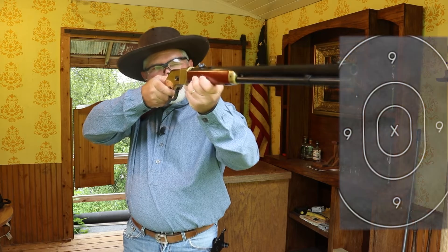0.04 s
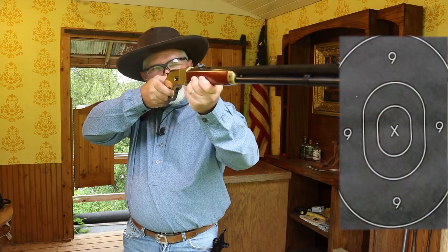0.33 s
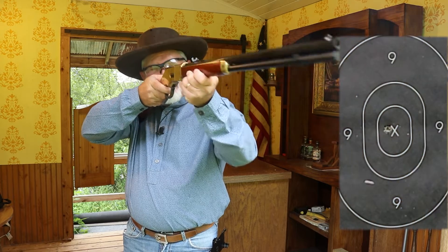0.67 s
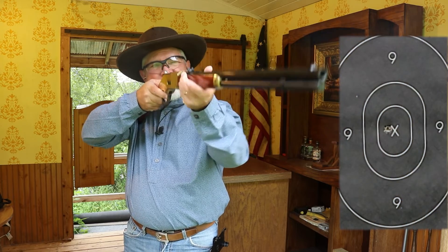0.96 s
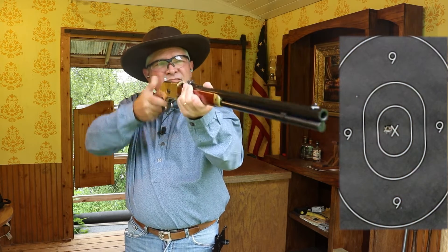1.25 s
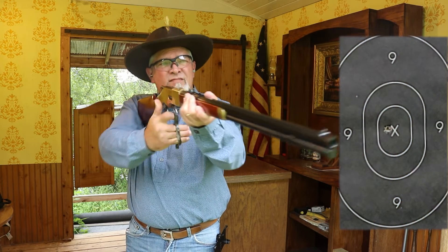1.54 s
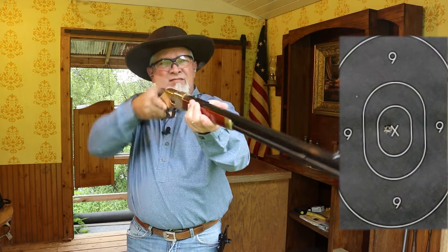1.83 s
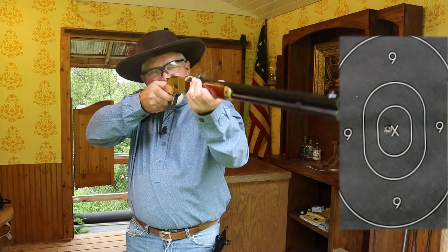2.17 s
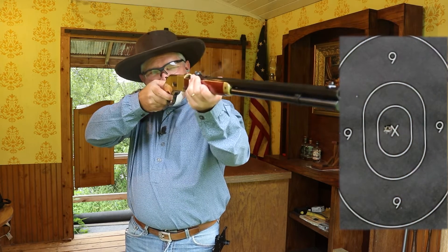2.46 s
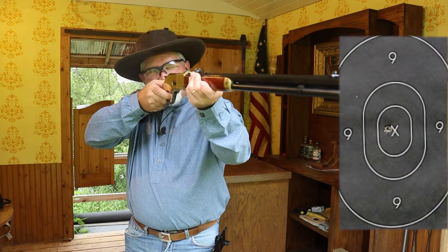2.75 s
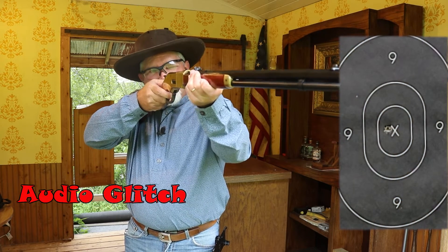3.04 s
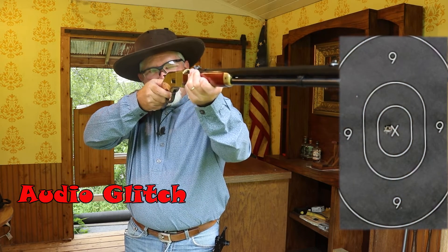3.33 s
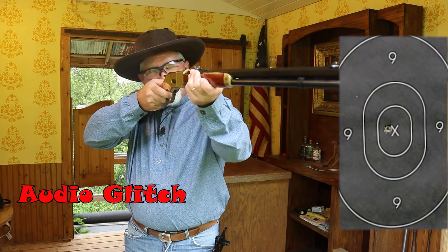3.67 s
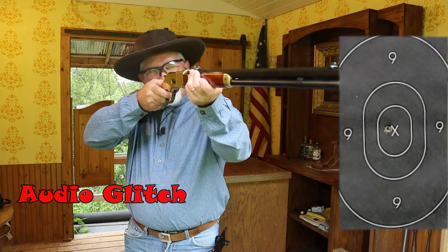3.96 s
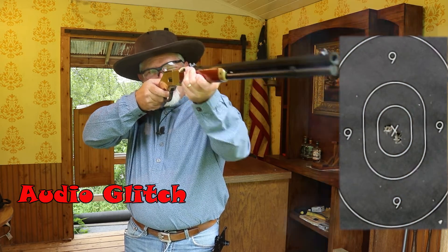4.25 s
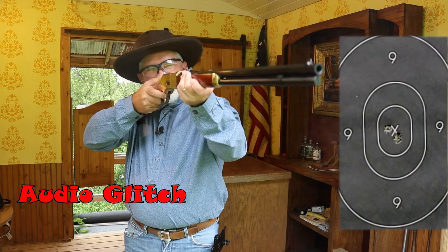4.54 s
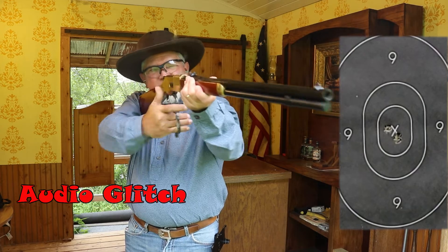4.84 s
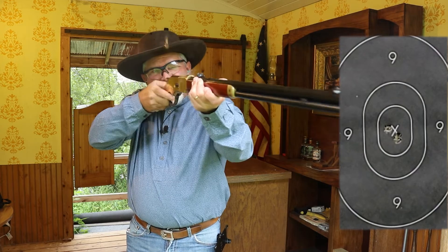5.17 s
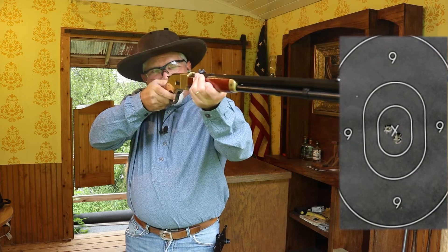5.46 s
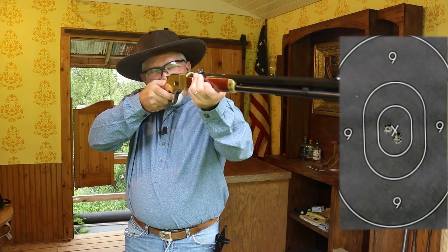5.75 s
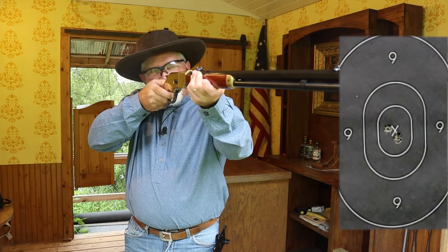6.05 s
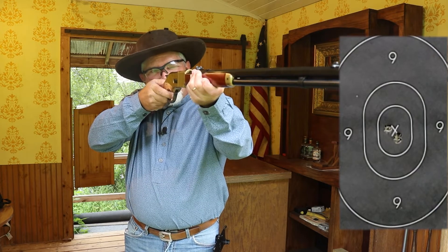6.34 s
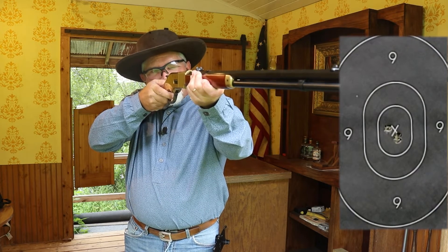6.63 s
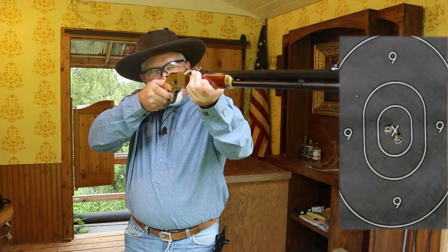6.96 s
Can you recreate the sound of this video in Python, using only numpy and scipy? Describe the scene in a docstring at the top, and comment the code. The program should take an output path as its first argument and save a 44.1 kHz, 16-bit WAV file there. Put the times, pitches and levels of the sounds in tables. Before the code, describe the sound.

A lever-action rifle fires and cycles; the sound cuts to hiss, returning with a steel clack and stuttering outdoor air.

```python
"""Lever-action rifle by woodland.

A shot from a wooden room overloads a close microphone and rolls back from the trees. The steel lever
clacks open and shut. Outside, a breeze rumbles, insects buzz and something hoots far off.
The signal drops out briefly, then chops up a metallic ring and sinks to over two seconds of almost
bare hiss. It returns on another lever clack and a second shot's echo, stuttering with dull thuds."""
import sys
import numpy as np
from scipy import signal
from scipy.fft import rfft, irfft
from scipy.io import wavfile
from scipy.ndimage import uniform_filter1d

SR = 44100
rng = np.random.default_rng(int(sys.argv[2]) if len(sys.argv) > 2 else 0)


def transcribe(signal):
    """Save signal, clipped to [-1, 1], as a 16-bit WAV file at the path in sys.argv[1]."""
    frames = np.atleast_2d(signal).T
    limited = np.clip(frames, -1, 1)
    pcm = np.round(limited * 32767).astype(np.int16)
    wavfile.write(sys.argv[1], SR, pcm)


N = 317520
TIME = np.arange(N) / SR


def from_db(db):
    return 10 ** (np.asarray(db) / 20)


def unit_rms(x):
    return x / np.sqrt(np.mean(x ** 2) + 1e-20)


def curves(rows):
    """Each column after the first, interpolated over time."""
    times_s, *columns = np.transpose(rows)
    return [np.interp(TIME, times_s, column) for column in columns]


def during(start_s, end_s):
    """Gate with 1 ms edges."""
    return np.clip(np.minimum(TIME - start_s, end_s - TIME) * 1000, 0, 1)


def noise(spectrum):
    """Unit-rms noise from (frequency [Hz], density [dB]), rolled off beyond the ends."""
    hz, db = np.transpose(spectrum)
    bins_hz = np.maximum(np.fft.rfftfreq(N, 1 / SR), 1)
    skirts = np.minimum(1, np.minimum(bins_hz / hz[0], hz[-1] / bins_hz)) ** 2
    gain = skirts * from_db(np.interp(np.log(bins_hz), np.log(hz), db))
    return unit_rms(irfft(rfft(rng.standard_normal(N)) * gain, N))


def drift(rate_hz):
    """Smooth random wander, unit rms."""
    bins_hz = np.fft.rfftfreq(N, 1 / SR)
    return unit_rms(irfft(rfft(rng.standard_normal(N)) / (1 + (bins_hz / rate_hz) ** 2) ** 2, N))


def steady(x, samples=128):
    """Flatten the short-term level."""
    return x / np.sqrt(np.abs(uniform_filter1d(x * x, samples)) + 1e-12)


def butter(x, order, hz, kind="low"):
    return signal.sosfilt(signal.butter(order, hz, kind, fs=SR, output="sos"), x + 1e-18)


def resonate(x, modes):
    """Parallel resonators (frequency [Hz], width [Hz], gain [dB]), signs alternating."""
    out = 0
    for k, (hz, width_hz, db) in enumerate(modes):
        radius = np.exp(-np.pi * width_hz / SR)
        b = (1 - radius ** 2) / 2 * np.array([1, 0, -1])
        a = [1, -2 * radius * np.cos(2 * np.pi * hz / SR), radius ** 2]
        out += (-1) ** k * from_db(db) * signal.lfilter(b, a, x + 1e-18)
    return out


def decay(t60_s):
    """Ages and amplitudes of a fall to -60 dB."""
    age_s = np.arange(int(t60_s * SR) + 2) / SR
    return age_s, np.exp(-np.log(1000) * age_s / t60_s)


def add(track, start_s, sound):
    at = round(start_s * SR)
    track[at:at + len(sound)] += sound[:N - at]


def bursts(rows):
    """Power-summed envelope of hits (time [s], level [dB], t60 [s])."""
    power = np.zeros(N)
    for s, db, t60_s in rows:
        _, fall = decay(t60_s)
        add(power, s, (from_db(db) * fall) ** 2)
    return np.sqrt(power)


# breeze strength: (time [s], level [dB])
BREEZE_LEVEL = [(0, -51), (.25, -52.5), (.55, -48), (1.1, -48), (2.3, -55), (5.35, -55), (5.85, -46),
                (7.2, -48.5)]
# wind rumble; body and treble of the woods, shared with the echo: (frequency [Hz], density [dB])
RUMBLE_SPECTRUM = [(15, -13), (45, 0), (100, -0.5), (220, -3.5), (350, -3.5), (550, -12.5), (900, -29)]
WOODS_BODY = [(120, -30), (250, -12.5), (450, 1.5), (620, 1.5), (950, 0), (1400, -9), (2200, -19),
              (4000, -39.5)]
WOODS_TREBLE = [(900, -13), (1600, 11), (2600, 4), (4000, -1), (6000, -10), (10000, -19), (16000, -26.5)]

def breeze(gust_db=2.0, air_db=-59.5, early_lift_db=6):
    """Moving air rumbles on the microphone and stirs leaves; brighter before the first shot."""
    db, = curves(BREEZE_LEVEL)
    gusts = from_db(db + gust_db * drift(8.9))
    rumble_and_leaves = noise(RUMBLE_SPECTRUM) + noise(WOODS_BODY)
    before_shot = TIME < ECHOES[0][0]
    air = from_db(air_db + db - db.max() + early_lift_db * before_shot) * noise(WOODS_TREBLE)
    return gusts * rumble_and_leaves + air


# insect chorus: (time [s], level [dB])
INSECT_LEVEL = [(0, -55), (.6, -59), (.75, -63.5), (2.6, -66.5), (5.3, -63), (5.6, -58), (7.2, -59.5)]
# its buzz: (frequency [Hz], density [dB])
INSECT_SPECTRUM = [(4800, -24.5), (5500, -6), (5900, -0.5), (6500, -11.5), (7300, -2), (7700, -3),
                   (8100, -2.5), (8900, -13.5), (10500, -16.5), (16000, -19.5)]

def insects(pitch_hz=7300, droop_hz=420, pulse_hz=28.3, phrase_hz=5.05, near_db=1, high_db=-5):
    """A chorus buzzes; one near insect pulses with drooping pitch; a higher one joins late in phrases."""
    db, = curves(INSECT_LEVEL)
    cycle = np.cumsum(pulse_hz * (1 + .015 * drift(2))) / SR % 1
    droop = .25 - 2 * (cycle - .4) ** 2 - cycle / 2
    hz = pitch_hz + droop_hz * droop + 70 * drift(570)
    near = 2 * np.sin(np.pi * cycle) ** 4 * np.sin(2 * np.pi * np.cumsum(hz) / SR)
    phrases = np.maximum(np.cos(2 * np.pi * phrase_hz * (TIME - 6.51)), 0) ** 2
    high_band = noise([(7500, -40), (8900, 2), (9300, -2), (9550, -10), (10500, -40)])
    high = phrases * (TIME > OUTDOORS_LOST_S[1]) * high_band
    level = from_db(db + 1.5 * drift(8))
    return level * (noise(INSECT_SPECTRUM) + from_db(near_db) * near + from_db(high_db) * high)


# soft thuds: (time [s], level [dB])
THUDS = [(.327, -37), (.532, -36), (.551, -35), (.581, -33), (5.859, -33), (5.94, -24), (6.129, -35),
         (6.148, -36), (6.182, -25), (6.208, -23), (6.259, -27), (6.292, -28), (6.683, -33)]

def dull_thuds(t60_s=.025, crackle_s=(6.184, 6.305), crackle_db=-40.5, grain_db=5, top_hz=2700):
    """Soft, dull thuds and crackle, mostly where the signal stutters."""
    crackle = during(*crackle_s) * from_db(crackle_db + grain_db * np.minimum(drift(290), 2))
    thuds = bursts((s, db, t60_s) for s, db in THUDS)
    body = steady(noise([(100, -7), (450, 8.5), (900, 1), (1800, -13.5), (3500, -31)]), samples=256)
    return butter(np.hypot(thuds, crackle) * body, 4, top_hz)


# stutters of the outdoor sound: (start [s], end [s], dip depth [dB], dip threshold [0-1])
STUTTERS = [(.48, .63, 11, .5), (.792, .83, 12, .5), (2.42, 2.6, 8, .45), (5.79, 5.93, 10, .55),
            (6.09, 6.163, 15, .65), (6.163, 6.182, 17, 1), (6.182, 6.3, 12, .5), (6.6, 6.85, 6, .45),
            (7.02, 7.2, 5, .4)]

def stutter(rate_hz=260, lift_db=3):
    """Gain that flicks at random between lifted and dipped during each spell."""
    chance = (1 + np.tanh(drift(rate_hz))) / 2
    gain = np.ones(N)
    for start_s, end_s, depth_db, threshold in STUTTERS:
        spell = (TIME > start_s) & (TIME <= end_s)
        gain[spell] = from_db(lift_db - depth_db * (chance[spell] < threshold))
    return uniform_filter1d(gain, size=48)


# first fronts of the shot: (time [s], level [dB], length [s], treble [dB])
CRACKS = [(0.6388, -12.5, 0.0027, 4), (0.6475, -10.5, 0.0026, 1), (0.65, -12.5, .0025, -5.5)]
# blast surges in the room: (time [s], length [s], drive [dB])
BLAST_SURGES = [(.654, .031, -26), (.6605, .0135, -10.5), (.6855, .056, -10.5), (.742, .049, -21.5)]
# crack, blast, and the bright snap shared with the action: (frequency [Hz], density [dB])
CRACK_SPECTRUM = [(60, -10), (400, -3), (1200, 5), (2600, -6), (5000, -4.5), (9000, -10.5), (16000, -22)]
BLAST_SPECTRUM = [(50, -27.5), (200, -17), (450, -5.5), (700, 0.5), (1000, -4.5), (1600, -10.5),
                  (3000, -17.5), (6000, -26), (16000, -42.5)]
SNAP_SPECTRUM = [(1500, -22), (3000, -2.5), (5000, -1.5), (7000, -6), (9000, -9.5), (11500, -6.5),
                 (14000, -13.5), (16000, -14)]

def shot(sag_db_per_s=85, ceiling=.22, fizz_db=-36, boom_s=.649, boom_db=-22, boom_t60_s=.057):
    """Sharp fronts and a deep boom, then room ringing squared off by the overloaded microphone."""
    body = steady(noise(CRACK_SPECTRUM))
    treble = steady(noise(SNAP_SPECTRUM))
    cracks = np.zeros(N)
    for s, db, length_s, treble_db in CRACKS:
        front = during(s - .0005, s + length_s + .0005)
        cracks += front * from_db(db) * (1.1 * body + from_db(treble_db) * treble)
    drive = sum(during(s, s + length_s) * from_db(db - sag_db_per_s * np.maximum(TIME - s, 0))
                for s, length_s, db in BLAST_SURGES)
    squared = np.tanh(drive * steady(noise(BLAST_SPECTRUM), samples=256) / ceiling)
    bass = steady(noise([(30, 8.5), (70, 0), (170, -4.5), (300, -15)]), samples=1024)
    boom = bursts([(boom_s, boom_db, boom_t60_s)]) * bass
    return cracks + boom + ceiling * squared + from_db(fizz_db) * squared * treble


# echoing shots, the second fired during the long dropout: (time [s], body [dB], treble [dB])
ECHOES = [(.639, -23.5, -31), (4.28, -16.5, -25.5)]

def woodland_echo(crest_delay_s=.41, crest_db=4.5, crest_width_s=.017, grain_db=1.28):
    """Trees scatter each shot into a grainy roll; one strong reflection crests, the treble dies first."""
    body, treble = 0, 0
    for s, body_db, treble_db in ECHOES:
        from_crest_s = TIME - s - crest_delay_s
        before_s, after_s = np.minimum(from_crest_s, 0), np.maximum(from_crest_s, 0)
        crest = (TIME > s) * from_db(crest_db * np.exp(-(from_crest_s / crest_width_s) ** 2))
        body += crest * from_db(body_db + 21 * before_s - 21 * after_s ** 1.17)
        treble += crest * from_db(treble_db + 9 * before_s - 31 * after_s ** .84)
    roll = body * noise(WOODS_BODY) + treble * noise(WOODS_TREBLE)
    return roll * from_db(grain_db * drift(150))


# knocks of stock and receiver: (time [s], level [dB], pitch [Hz], t60 [s])
KNOCKS = [(0.649, -7.5, 154, 0.017), (1.412, -22, 450, .006), (1.5268, -16, 337, 0.034),
          (1.528, -22, 109, 0.051), (1.9806, 1.5, 630, 0.005), (1.9846, -13, 256, 0.017),
          (2.596, 1, 780, 0.0024), (2.5952, -21.5, 192, 0.019), (2.601, -16, 500, 0.0037),
          (2.613, -17, 698, 0.0038), (2.6177, -7, 1129, 0.013), (5.2137, 1.5, 1166, 0.0077),
          (5.2158, -18.5, 193, 0.029), (5.242, -21, 1357, 0.09), (5.278, -8, 770, 0.012),
          (5.2798, -11.5, 290, 0.025), (5.9395, -17.5, 625, 0.029)]

def knocks(top_hz=2500):
    """Heavily damped swings of a few cycles, rounded by soft contact."""
    out = np.zeros(N)
    for s, db, hz, t60_s in KNOCKS:
        age_s, fall = decay(t60_s)
        add(out, s, from_db(db) * fall * np.cos(2 * np.pi * hz * age_s))
    return butter(out, 3, top_hz)


def ducking(key, threshold_db=-24, slope=1.8, max_db=19, hold_s=.06, release_db_per_s=88, lag_s=.02):
    """Gain that sinks when the key is loud, holds, then recovers at a steady rate."""
    level_db = 10 * np.log10(np.abs(uniform_filter1d(key ** 2, size=1764)) + 1e-12)
    cut_db = np.clip(slope * (level_db - threshold_db), 0, max_db)
    ramp_db = release_db_per_s * TIME
    released_db = np.maximum.accumulate(cut_db + ramp_db) - ramp_db
    held_db = np.maximum(released_db, np.interp(TIME - hold_s, TIME, released_db))
    return from_db(-np.interp(TIME - lag_s, TIME, held_db))


# light steel contacts: (time [s], level [dB], t60 [s], clang [dB], treble [dB])
TOUCHES = [(1.399, -31, .05, -2.5, -22), (1.405, -25, .03, -2, -22), (1.4123, -18, 0.034, 1.5, -23.5),
           (1.4343, -24.5, 0.067, -2, -14), (1.439, -21, .018, -2, 3), (1.4987, -24, 0.059, -11, -22.5),
           (1.517, -28, .03, 2, -0.5), (1.783, -33, 0.043, -5.5, -23), (1.8335, -21.5, 0.035, 0, -16),
           (1.9603, -24.5, .01, 10, -14.5), (1.9715, -26, .05, -3, -3.5), (2.6028, -11, 0.0084, 1, -14.5),
           (5.939, -47.5, 0.042, -13, 4)]
# lever and bolt hitting a stop:
# (time [s], level [dB], t60 [s], clang [dB], treble [dB], bounce gap [s], bounce loss [dB], room [dB])
SLAMS = [(1.525, -10.5, .036, 1.5, -7.5, 0.0068, 2.5, -42.5),
         (1.838, -15, .04, 8.5, -2.5, .0155, 10.5, -48), (1.9565, -17, 0.027, 2.5, -10, 0.0063, 4, -38.5),
         (5.2133, -7.5, 0.034, -4, -9.5, .014, 5, -41)]
# thin lasting ring of steel: (frequency [Hz], level [dB], t60 [s])
STEEL_MODES = [(890, -24.5, 0.2035), (1340, -44, .5), (2050, -42, 0.26), (4930, -48.5, 0.83),
               (11740, -55, .8)]
# stock and receiver; lever and bolt: (frequency [Hz], width [Hz], gain [dB])
STOCK_MODES = [(352.4, 400, -14), (930, 230, 1), (1180, 250, -1.5), (1520, 220, -5)]
LEVER_MODES = [(1738, 250, -10.5), (2074, 200, 3.5), (2490, 180, 2), (2822, 200, -1), (3660, 250, -10),
               (4220, 250, -13.5), (5180, 150, -13)]

def lever_action(bounces=3, firm_t60_s=.03, ring_width_hz=70, muting=1.4):
    """Steel grates and bounces: the stock barks, the lever clangs, edges snap, thin modes ring on."""
    slams = [(s + k * gap_s, db - k * loss_db, t60_s, clang_db, treble_db)
             for s, db, t60_s, clang_db, treble_db, gap_s, loss_db, _ in SLAMS
             for k in range(bounces + 1)]
    s, db, t60_s, clang_db, treble_db = np.transpose(TOUCHES + slams)
    # glancing or dull contacts barely ring
    ring_db = db + 40 * np.log10(np.minimum(t60_s / firm_t60_s, 1)) + muting * np.minimum(clang_db, 0)
    ring = 0
    for hz, mode_db, mode_t60_s in STEEL_MODES:
        band = noise([(.97 * hz, 0), (1.02 * hz, 0)])
        beating = unit_rms(resonate(band, [(hz, ring_width_hz, 0)]))
        ring += beating * bursts((at_s, hit_db + mode_db, mode_t60_s) for at_s, hit_db in zip(s, ring_db))
    stock = steady(resonate(noise([(200, .0033), (2500, .0072)]), STOCK_MODES))
    lever = steady(resonate(noise([(1400, .0038), (6000, .0022)]), LEVER_MODES))
    bark = bursts(zip(s, db, t60_s)) * stock
    clang = bursts(zip(s, db + clang_db, t60_s)) * lever
    snap = bursts(zip(s, db + treble_db, t60_s)) * steady(noise(SNAP_SPECTRUM))
    return ring + .89 * bark + .73 * clang + snap


UNLOCK_S = 1.44
# small steel parts: (frequency [Hz], width [Hz], gain [dB])
UNLOCK_MODES = [(1700, 210, -4), (2830, 240, -0.5), (4280, 240, -1.5), (5040, 190, -2), (7200, 580, -21),
                (9150, 190, -6.5), (10900, 360, -6)]

def unlock(level_db=-5, t60_s=.012):
    """One hard, short contact sets small parts pinging as the action unlocks."""
    contact = noise([(1200, 1.5), (11000, -5.5), (13000, -9.5)])
    return bursts([(UNLOCK_S, level_db, t60_s)]) * steady(resonate(contact, UNLOCK_MODES))


# crisp onsets of the hardest hits: (time [s], level [dB])
CLICKS = [(1.4403, -6), (1.5255, -5), (2.6019, -14), (5.2134, -14)]

def clicks(t60_s=.0013):
    """Edge meets edge in a flash of treble."""
    treble = steady(noise([(3000, -7.5), (7000, -1), (15000, 2.5)]), samples=32)
    return bursts((s, db, t60_s) for s, db in CLICKS) * treble


def room(t60_s=.65, unlock_db=-44):
    """The wooden room rings faintly after the unlocking and each slam."""
    hits = [(UNLOCK_S, unlock_db)] + [(s, room_db) for s, *_, room_db in SLAMS]
    tails = bursts((s, db, t60_s) for s, db in hits)
    return tails * noise([(250, -8.5), (900, 2), (2000, -3.5), (5000, -7.5), (16000, -22)])


# first fragments of the ring that get through: (time [s], level [dB], length [s])
RING_FRAGMENTS = [(2.606, -12, 0.0012), (2.6107, -18, 0.0032), (2.6167, -11, 0.0041),
                  (2.629, -23.5, 0.0085), (2.641, -28.5, 0.00519), (2.652, -26.5, 0.0096),
                  (2.668, -26.5, 0.0091)]
# metallic ring: (frequency [Hz], width [Hz], gain [dB])
RING_MODES = [(380, 307, -2.5), (1102, 146, 6.5), (1790, 108, -3), (2200, 214, -8), (3110, 152, -21.5),
              (4800, 29, -9.5), (7490, 5000, -42.5), (10620, 149, -32.5), (15600, 135, -33)]

def chopped_ring(tail_s=(2.682, 2.858), tail_db=-26, fade_db_per_s=126, chop_hz=150, shrink_s=.095):
    """A metallic ring, chopped into ever shorter, fainter bursts as the signal breaks up."""
    opening = sum(from_db(db) * during(s - .0005, s + length_s + .0005)
                  for s, db, length_s in RING_FRAGMENTS)
    age_s = np.maximum(TIME - tail_s[0], 0)
    uneven_hz = chop_hz * from_db(6 * drift(108.6))
    cycle = np.cumsum(uneven_hz * (age_s > 0)) / SR % 1
    duty = .91 * np.exp(-age_s / shrink_s)
    gate = uniform_filter1d((cycle < duty) * during(*tail_s), size=36)
    tail = gate * from_db(tail_db - fade_db_per_s * age_s + 3 * drift(84))
    return np.hypot(opening, tail) * steady(resonate(rng.standard_normal(N), RING_MODES))


# blips in the hiss: (time [s], level [dB], t60 [s])
BLIPS = [(4.283, -54.5, 0.053), (4.305, -66, .06)]

def blips(centre_hz=950, width_hz=160):
    """A faint, muffled double tick."""
    band = steady(resonate(rng.standard_normal(N), [(centre_hz, width_hz, 0)]), samples=256)
    return resonate(bursts(BLIPS) * band, [(centre_hz, 2 * width_hz, 0)])


# far hoot: (time [s], pitch [Hz], level [dB])
HOOT_CONTOUR = [(6.84, 437, -54), (6.869, 456, -46), (6.9, 504, -33.5), (6.925, 538, -56), (6.99, 530, -48),
                (7.02, 520, -75)]

def hoot(octave_db=-14):
    """A soft, rising, wavering note with a weak octave."""
    hz, db = curves(HOOT_CONTOUR)
    phase = 2 * np.pi * np.cumsum(hz * (1 + .024 * drift(69))) / SR
    tone = np.sqrt(2) * (np.sin(phase) + from_db(octave_db) * np.sin(2 * phase))
    return from_db(db) * during(HOOT_CONTOUR[0][0], HOOT_CONTOUR[-1][0]) * tone


OUTDOORS_LOST_S = (2.61, 5.2135)

def scene(pan_db=1.46, low_cut_hz=65, key_hz=750):
    """One microphone, louder on the right; the outdoors ducks after bright bangs, stutters, drops out."""
    rifle = shot() + lever_action() + clicks() + unlock() + knocks() + chopped_ring()
    rifle = butter(rifle, 2, low_cut_hz, "high")
    bright = butter(rifle, 2, key_hz, "high")
    outdoors = woodland_echo() + breeze() + insects() + hoot()
    outdoors *= ducking(bright) * stutter() * (1 - during(*OUTDOORS_LOST_S))
    mono = rifle + room() + dull_thuds() + outdoors + blips()
    return mono * from_db([[-pan_db], [pan_db]])


# electrical whine: (frequency [Hz], level [dB])
WHINE_TONES = [(6012, -87), (12024, -85)]
# noise floor: (frequency [Hz], density [dB])
HISS_SPECTRUM = [(20, 6), (100, 6), (400, 3.5), (1000, 1), (3000, 0), (16000, -2)]

def record(dry, ceiling=.6, hiss_db=-65, silent_s=(1.8745, 1.9563), cutoff_hz=16000):
    """Rounded peaks, hiss per channel, faint whine, one brief total dropout and a steep low-pass."""
    whine = sum(from_db(db) * np.sqrt(2) * np.sin(2 * np.pi * hz * TIME) for hz, db in WHINE_TONES)
    hiss = from_db(hiss_db) * np.array([noise(HISS_SPECTRUM), noise(HISS_SPECTRUM)])
    wet = ceiling * np.tanh(dry / ceiling) + hiss + whine
    lowpass = signal.ellip(10, .1, 80, cutoff_hz, fs=SR, output="sos")
    return signal.sosfilt(lowpass, wet * (1 - during(*silent_s)))


dry = scene()
out = record(dry)
transcribe(out)
```